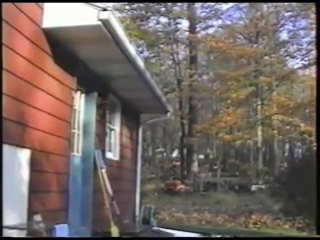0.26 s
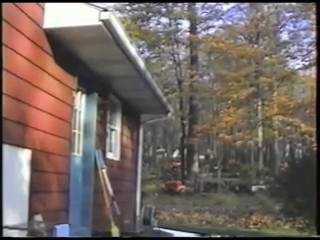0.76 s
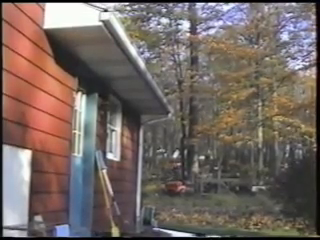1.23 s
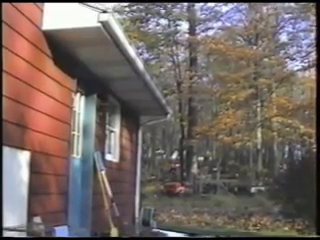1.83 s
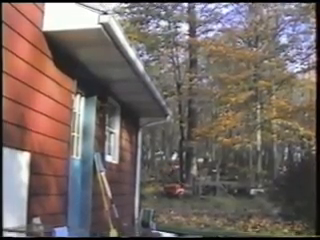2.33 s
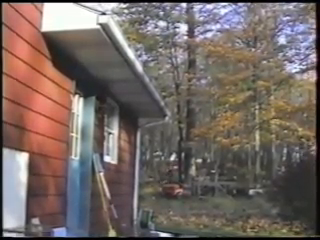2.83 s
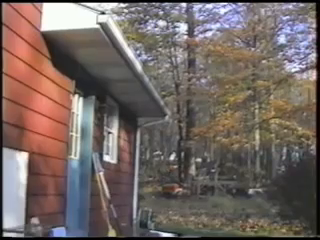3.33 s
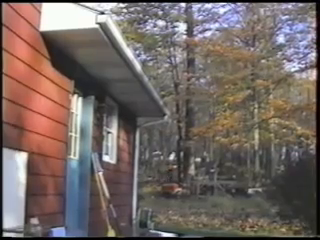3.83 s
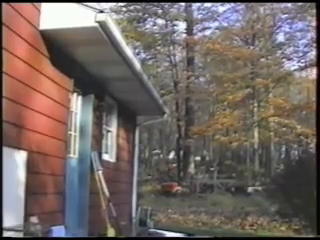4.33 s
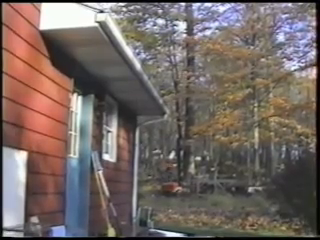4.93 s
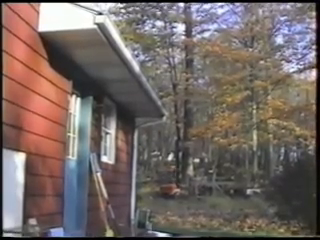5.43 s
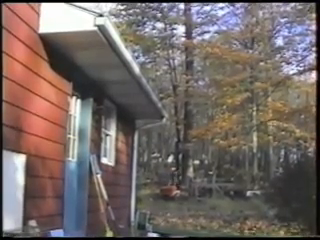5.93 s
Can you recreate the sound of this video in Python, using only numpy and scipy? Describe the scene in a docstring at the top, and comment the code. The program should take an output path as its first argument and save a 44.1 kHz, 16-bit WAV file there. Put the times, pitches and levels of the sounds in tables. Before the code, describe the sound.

Outdoors by autumn trees, a blade bites wood in five evenly spaced cracks, each scattering back briefly above soft hiss and electrical hum.

```python
"""A steady tape hiss and a wavering mains hum are there from the start: an old tape camera stands far off.
From 0.8 s to 4.5 s an axe chops a trunk at the edge of a wood, five blows about a second apart.
Each starts with a faint scrape, then a snap, a crack of noise, ringing sine waves and a low push;
fading noise, coloured like the blow, scatters back from the trees for about a second.
The loudest peaks are flattened, and just after 6 s the sound drops out for 34 ms."""
import sys
import numpy as np
from scipy import signal
from scipy.fft import rfft, irfft, next_fast_len
from scipy.io import wavfile
from scipy.ndimage import uniform_filter1d, map_coordinates

SR = 44100
rng = np.random.default_rng(int(sys.argv[2]) if len(sys.argv) > 2 else 0)


def wrap_up_sound(samples):
    """Save the sound to the file named by the first command line argument, as 16-bit audio."""
    columns = np.atleast_2d(samples).T
    # keep every value between -1 and 1, then stretch to whole-number steps
    tamed = np.clip(columns, -1, 1)
    steps = np.round(tamed * 32767).astype(np.int16)
    wavfile.write(sys.argv[1], SR, steps)


N = 271656

# ways in which trunk and blade can ring, called modes:
# (f/Hz, ring time as a multiple of the blow's, relative level towards the camera/dB,
#  relative level all round/dB)
WOOD_MODES = [(241, 0.61, -23, -5), (494.5, 3.2, -15.5, -2.5), (625, 0.46, -50.5, -7),
              (803, 1.2, -10.5, -0.4), (1039.4, 0.98, -3, 0.1), (1215, 0.74, -4, 0), (1366, 0.4, -4, -1),
              (1603, 0.19, -13, -2.5), (1929, 1.1, -7, 1.5), (2236, 0.12, -5.5, -2.5),
              (2605, 0.17, -6.5, -5), (2925, 0.32, -6, -4), (3632, 0.1, -11, -9.5),
              (4220, 0.58, -12.5, -11.5), (4945, 0.27, -13.5, -12), (7070, 0.069, -19.5, -19.5)]


def amp(db):
    """Turns decibels into a gain."""
    return 10 ** (np.asarray(db) / 20)


def unit(x):
    """Scales a sound to an average strength (rms) of 1."""
    return x / np.sqrt(np.mean(x ** 2) + 1e-20)


def along(hz_points, values, hz):
    """Joins values by straight lines on a log-frequency axis."""
    return np.interp(np.log(hz + 1), np.log(np.asarray(hz_points) + 1), values)


def coloured(x, spectrum):
    """Filters x: each frequency gets the gain of a smooth (f/Hz, level/dB) curve."""
    m = next_fast_len(len(x) + 8192)
    hz_points, levels_db = np.transpose(spectrum)
    gain = amp(along(hz_points, levels_db, np.fft.rfftfreq(m, 1 / SR)))
    return irfft(rfft(x, m) * gain, m)[:len(x)]


def wobble(rate):
    """A smooth random curve through `rate` random points a second."""
    points = rng.standard_normal(int(N * rate / SR) + 4)
    return map_coordinates(points, [np.arange(N) * rate / SR])


def hiss():
    """Tape hiss and distant air: coloured noise whose level drifts slightly."""
    # colour of the hiss: (f/Hz, relative level per Hz/dB)
    hiss_colour = [(12, -25), (30, -7), (45, -16.5), (60, -10.5), (90, -14.5), (200, -19.5), (450, -18.5),
                   (800, -24), (1500, -26.5), (3600, -31), (4100, -28), (4700, -29), (5300, -33),
                   (11000, -38), (12400, -40.5), (22000, -120)]
    level_db = -61 + 0.6 * wobble(3)
    return amp(level_db) * unit(coloured(rng.standard_normal(N), hiss_colour))


def hum():
    """Mains and tape drive: sine waves at fixed pitches that waver in size and phase."""
    # lines of the hum: (f/Hz, rms level before wavering/dB)
    hum_lines = [(60, -68), (120, -79), (180, -75), (240, -81), (420, -86), (1377, -83), (2039, -82.5)]
    t = np.arange(N) / SR
    total = np.zeros(N)
    for hz, db in hum_lines:
        size = np.sqrt(2) * amp(db + 1.1 * wobble(22))
        total += size * np.sin(2 * np.pi * hz * t + 0.22 * wobble(8.0))
    return total


def channel_difference(blows):
    """What sets left and right apart: faint noise, and a faint, quickly wavering difference that follows the
    blows."""
    # colour of the channel noise: (f/Hz, relative level per Hz/dB)
    apart_colour = [(12, -38), (20, 7), (27, -9), (71, -13.5), (131, -50), (1290, -53), (2670, -40.5),
                    (2980, -59), (3410, -63), (12400, -29), (16100, -51), (22000, -120)]
    noise = amp(-84) * unit(coloured(rng.standard_normal(N), apart_colour))
    flutter = amp(-40) * wobble(150) * blows
    return noise + flutter


def scatter(hz_points, t60, db, lumpy_db, size):
    """Many echoes: noise that fades at its own speed in each band, with lumps in its level."""
    hz, t, z = signal.stft(rng.standard_normal(size), SR, nperseg=256)
    lumps = uniform_filter1d(rng.standard_normal(z.shape), size=12, axis=0)
    start_db = along(hz_points, db, hz)[:, None]
    fade_s = along(hz_points, t60, hz)[:, None]  # time to fall by 60 dB
    level_db = start_db - 60 * t / fade_s + lumpy_db * unit(lumps)
    return signal.istft(z * amp(level_db), SR, nperseg=256)[1][:size]


def spread(levels_db, low_db, high_db):
    """A (f/Hz, level/dB) curve through the mode levels, falling away beyond the outer modes."""
    mode_hz = np.transpose(WOOD_MODES)[0]
    top_db = levels_db[-1] + high_db
    return [(30, low_db), *zip(mode_hz, levels_db), (12500, top_db), (22000, -120)]


def ringing(x, levels_db, width, between_db):
    """Gives x the colour of a blow: a peak at each mode, width a share of its pitch, over a wash."""
    m = next_fast_len(len(x) + 8192)
    f = np.fft.rfftfreq(m, 1 / SR)
    hz = np.transpose(WOOD_MODES)[0][:, None]
    peaks = np.max(1 / (1 + ((f - hz) / (width * hz)) ** 2), axis=0)
    hz_points, wash_db = np.transpose(spread(levels_db, low_db=-34, high_db=-19))
    wash = amp(along(hz_points, wash_db, f))
    # peaks and the floor between them add as powers
    gain = wash * np.sqrt(peaks + amp(2 * between_db))
    return irfft(rfft(x, m) * gain, m)[:len(x)]


def echoes(levels_db):
    """The blow comes back from the clearing's edge and, fading more slowly, from deeper in the wood."""
    # scatter from the clearing: (f/Hz, time to fall 60 dB/s, relative level/dB)
    clearing = [(121, 0.12, 10), (294, 0.48, 3), (650, 0.1, 15), (1050, 0.49, 0), (4020, 0.51, 2.5),
                (9800, 0.41, -0.5)]
    # scatter from the far trees: (f/Hz, time to fall 60 dB/s, relative level/dB)
    far_trees = [(120, 0.71, 9), (255, 0.28, -21), (497, 2.32, -4.5), (960, 2.196, -6.5), (2050, 1.54, -7),
                 (4170, 1.09, -2.5), (7860, 0.66, -5), (11900, 1.2, -8)]
    # answers of single trunks: (t after the blow/s)
    trunk_times = [.026, .035, .043, .055, .064, .081, .092, .102, .114]
    t = np.arange(2 * SR) / SR
    stands_out_db = np.zeros(len(t))
    for s in trunk_times:
        stands_out_db += 2 * np.exp(-0.5 * ((t - s) / 0.0022) ** 2)
    close = scatter(*np.transpose(clearing), lumpy_db=3.0, size=2 * SR) * amp(stands_out_db)
    far = scatter(*np.transpose(far_trees), lumpy_db=-0.5, size=2 * SR)
    both = ringing(close + far, levels_db, width=0.035, between_db=-3)
    early_rms = np.sqrt(np.mean(both[:SR // 4] ** 2))
    onset = 1 - np.exp(-t / 0.006)  # the echoes build up over a few ms
    return both / early_rms * onset


def thud_and_lead_in(thud_db, lead_db):
    """A faint scrape as the edge enters the bark, 4 ms ahead of one low push of the trunk."""
    t = np.arange(SR // 10) / SR - 0.004
    scrape_colour = [(300, -32), (1500, 13), (4000, 11), (12000, -36)]  # (f/Hz, relative level/dB)
    scrape = unit(coloured(rng.standard_normal(len(t)), scrape_colour)) * (t < 0)
    swell = 1 + t / 0.005  # the scrape grows towards the blow
    push = np.sin(2 * np.pi * 140 * t) * amp(-60 * t / 0.032) * (t > 0)
    return amp(lead_db) * scrape * swell + amp(thud_db) * push


def spot(tilt_db, low_hz, low_db, high_hz, high_db, muted_hz, cut_db):
    """The place of a blow favours modes near two pitches and mutes those near a third (in dB)."""
    hz = np.transpose(WOOD_MODES)[0]

    def nearness(centre_hz):
        """1 at the centre, fading smoothly over about 0.11 octaves."""
        return np.exp(-0.5 * (np.log2(hz / centre_hz) / 0.11) ** 2)

    tilt = tilt_db * np.log2(hz / 1000)
    boosts = low_db * nearness(low_hz) + high_db * nearness(high_hz)
    return tilt + boosts - cut_db * nearness(muted_hz)


def blow(contact_s, ring_s, crack_db, levels_db):
    """The blade snaps in and drives the modes while it bites, as fibres crack; then they die away."""
    # colour of the first bite of the edge: (f/Hz, relative level per Hz/dB)
    snap_colour = [(500, -45), (2000, 21), (4500, 1), (8000, -6), (12500, -21), (22000, -120)]
    t = np.arange(SR // 4) / SR
    free = np.maximum(t - contact_s, 0)  # seconds since the bite ended
    hz, life = np.transpose(WOOD_MODES)[:2, :, None]
    build = 1 - np.exp(-t * hz / 1.2)  # each mode needs a cycle or two to get going
    fading = amp(np.c_[list(levels_db)] - 60 * free / (ring_s * life))
    ring = build * fading * np.sin(2 * np.pi * (hz * t + rng.random(hz.shape)))

    crack_colour = spread(levels_db, low_db=-48.0, high_db=-16)
    crack = unit(coloured(rng.standard_normal(len(t)), crack_colour))
    crack = crack * amp(crack_db - 60 * free / 0.029)
    snap = unit(coloured(rng.standard_normal(len(t)), snap_colour))
    snap = snap * amp(crack_db + 5.5 - 60 * t / 0.021)
    attack = 1 - np.exp(-t / 0.0003)
    return ring.sum(axis=0) + (crack + snap) * attack


def axe():
    """Five blows on different spots: each is heard directly and as echoes, with a scrape and a thud."""
    # one row per blow: (t/s, strength/dB, contact/s, basic time for the ring to fall 60 dB/s,
    #  crack before strength is applied/dB, echo/dB, thud/dB, tilt/dB per octave,
    #  favoured f/Hz, boost/dB, favoured f/Hz, boost/dB, muted f/Hz, cut/dB)
    blow_list = [(0.8187, -23.5, 0.0056, 0.032, -2, -41.5, -45, 0.5, 1950, 3, 2820, 3, 1490, 8),
                 (1.6569, -23.5, 0.0049, 0.037, 2.5, -37.5, -31, 0.12, 1144, 10.5, 3780, 4, 2940, 3),
                 (2.5391, -21.5, 0.00074, 0.04, -7.5, -33.5, -40, 1, 1310, 8.5, 3620, 3.5, 2570, 0.5),
                 (3.4842, -18.5, 0.0051, 0.036, -2, -35, -46, 0, 500, 1.5, 830, 1, 1250, 2),
                 (4.5076, -19.5, 0.005, 0.034, 0, -33, -29, -0.64, 1010, 2.5, 2150, 6, 1290, 2)]
    out = np.zeros(N + 3 * SR)
    towards_db, around_db = np.transpose(WOOD_MODES)[2:]
    for s, db, contact_s, ring_s, crack_db, echo_db, thud_db, *place in blow_list:
        at = round(s * SR)
        spot_db = spot(*place)
        # the spot colours the direct sound 1.3 times as much as the sound sent all round
        direct_db = towards_db + 1.3 * spot_db
        out[at:][:SR // 4] += amp(db) * blow(contact_s, ring_s, crack_db, direct_db)
        out[at:][:2 * SR] += amp(echo_db) * echoes(around_db + spot_db)
        start = at - SR // 250  # the scrape begins 4 ms early
        out[start:][:SR // 10] += thud_and_lead_in(thud_db, lead_db=-41)
    return out[:N]


def scene():
    """The same blows, hum and hiss feed both channels, plus a small opposite difference in each."""
    blows = axe()
    apart = channel_difference(blows)
    return blows + hum() + hiss() + np.array([apart, -apart])


def record(dry):
    """The microphone stage squeezes peaks; the signal drops out once; nothing stays above 12.3 kHz."""
    # the dropout: (start t/s, end t/s)
    dropout = (6.040, 6.074)
    # steady voltage, one row per channel: (offset as a share of full scale)
    offset = np.array([
        [.0063],
        [.0068],
    ])
    squeezed = dry / (1 + np.abs(dry / 0.25) ** 3) ** (1 / 3)
    t = np.arange(N) / SR
    playing = np.where((t > dropout[0]) & (t < dropout[1]), 0.03, 1)
    # the voltage drops out too; its steady part stays out of the filter
    varying = (squeezed + offset) * playing - offset
    m = next_fast_len(N + 8192)
    passed = np.fft.rfftfreq(m, 1 / SR) < 12300
    kept = irfft(rfft(varying, m) * passed, m)[:, :N]
    return kept + offset


dry = scene()
out = record(dry)
wrap_up_sound(out)
```